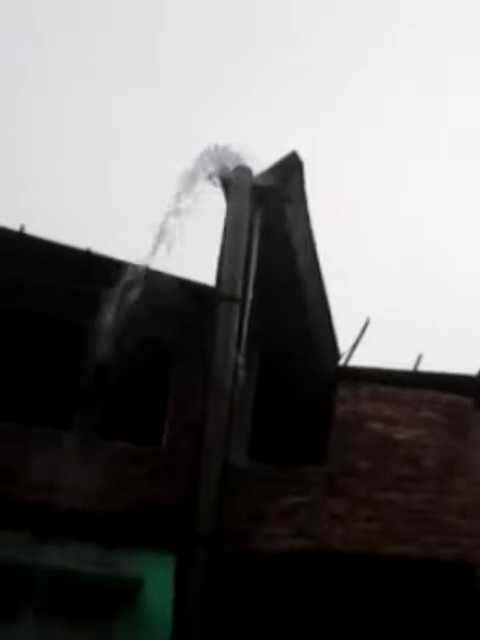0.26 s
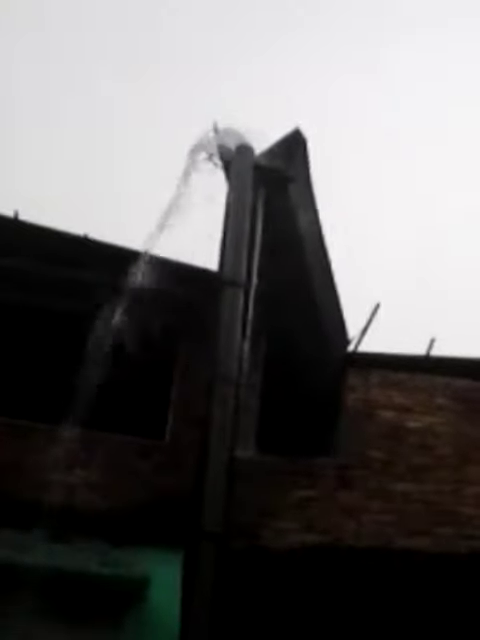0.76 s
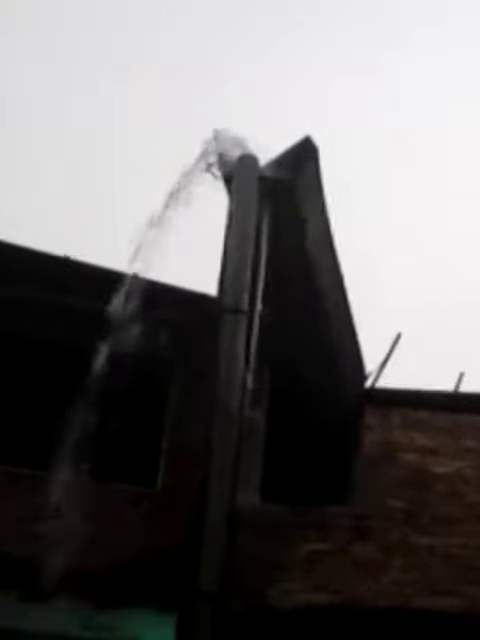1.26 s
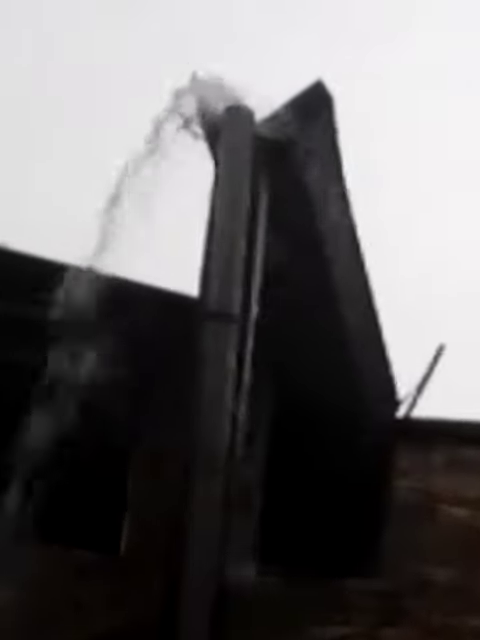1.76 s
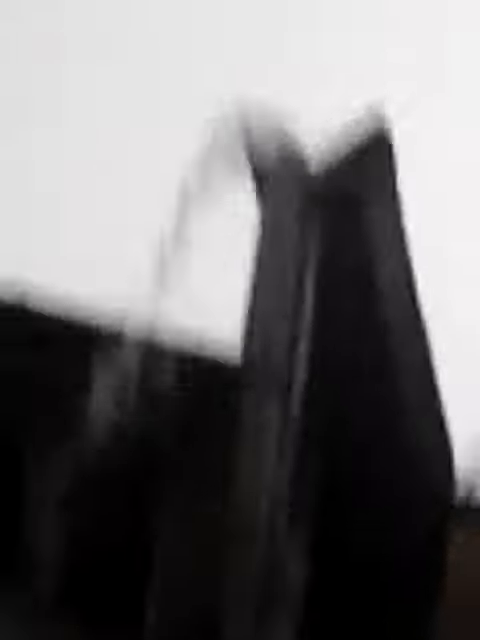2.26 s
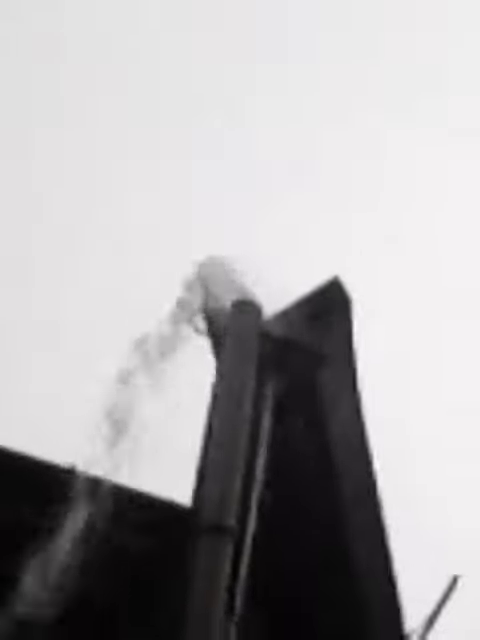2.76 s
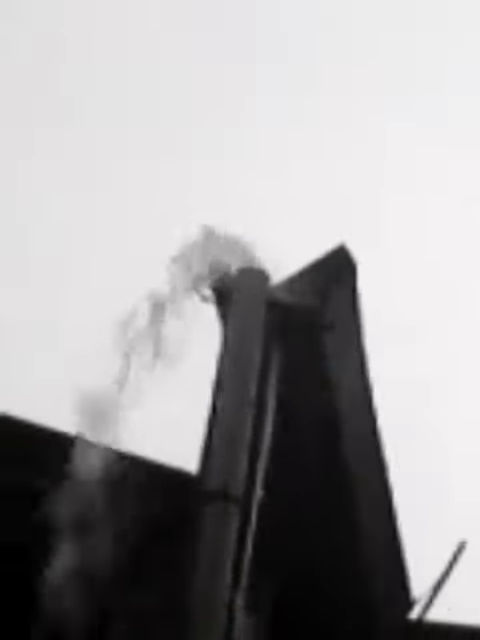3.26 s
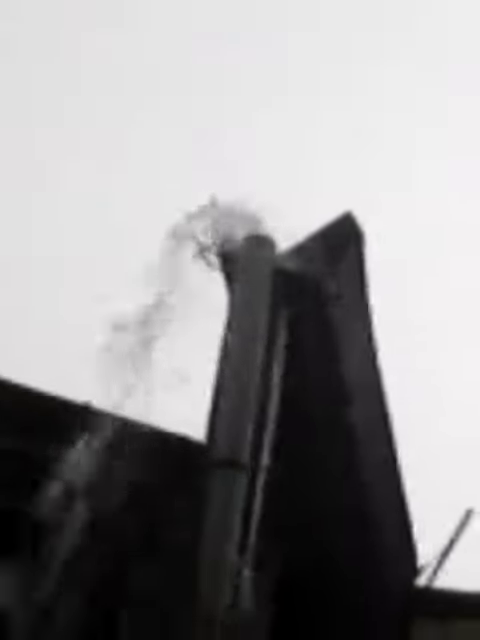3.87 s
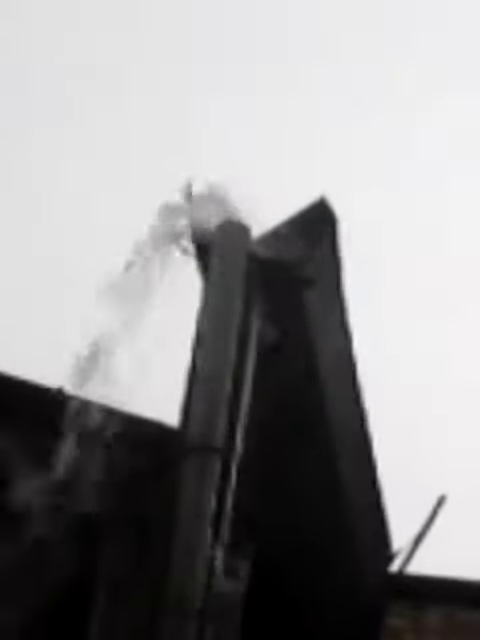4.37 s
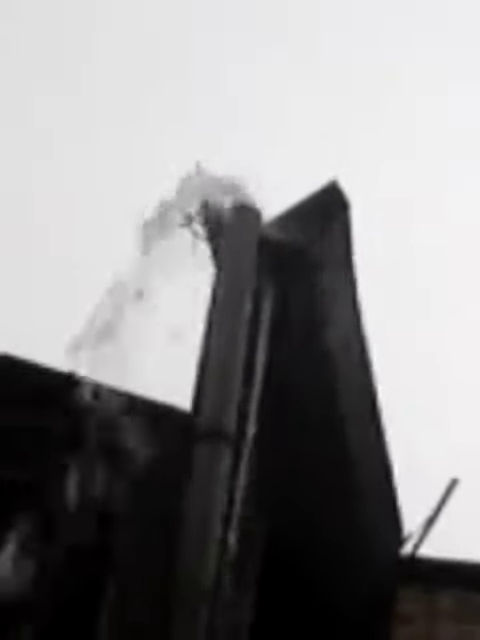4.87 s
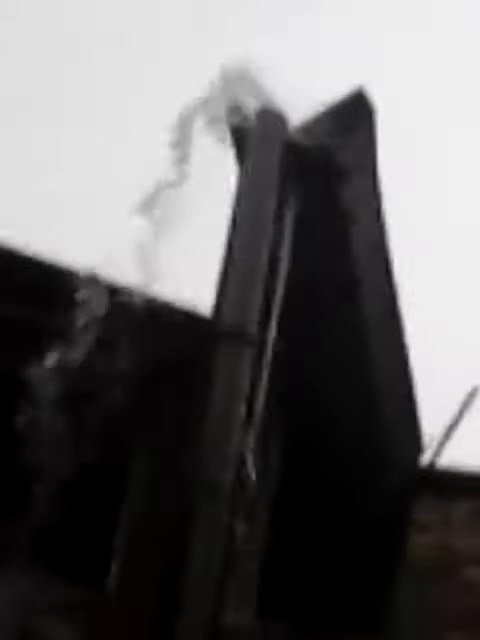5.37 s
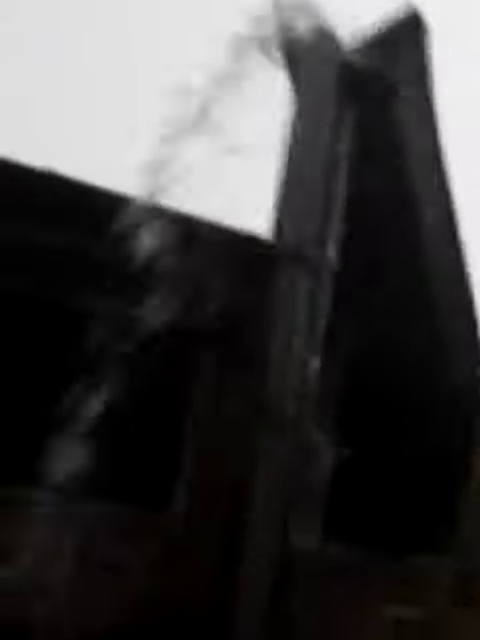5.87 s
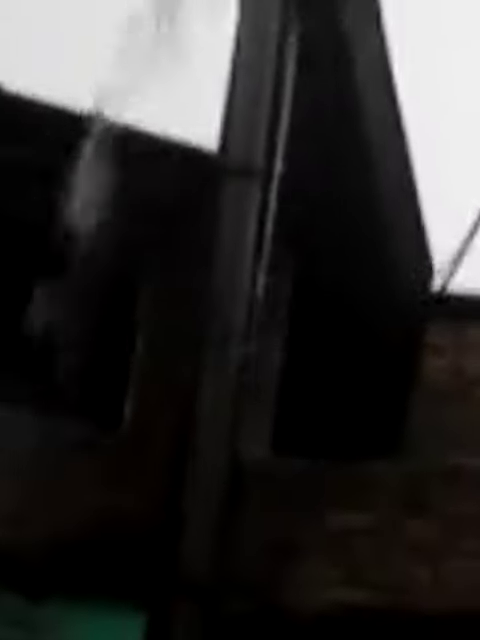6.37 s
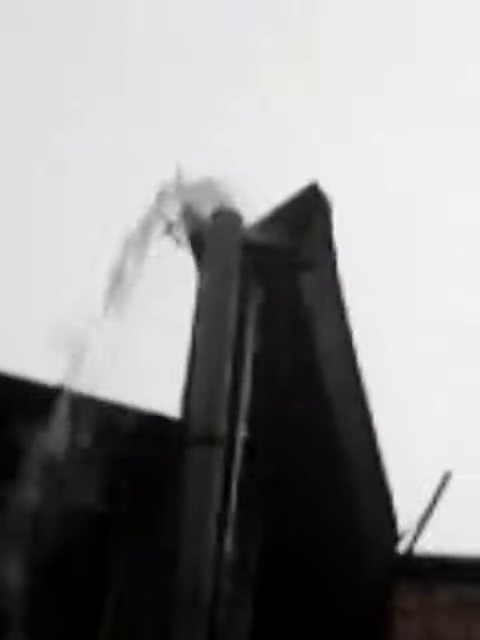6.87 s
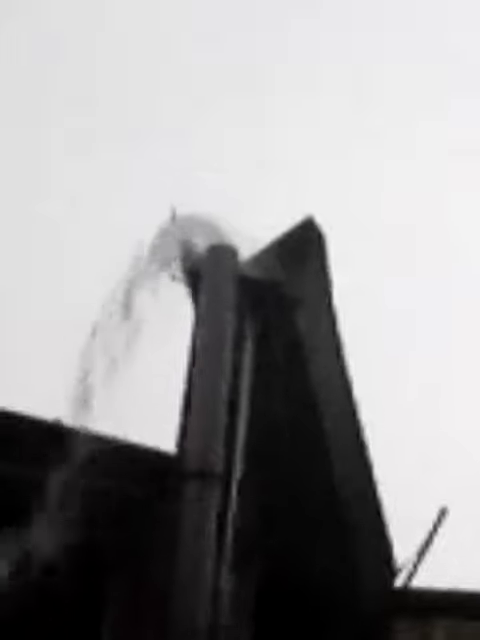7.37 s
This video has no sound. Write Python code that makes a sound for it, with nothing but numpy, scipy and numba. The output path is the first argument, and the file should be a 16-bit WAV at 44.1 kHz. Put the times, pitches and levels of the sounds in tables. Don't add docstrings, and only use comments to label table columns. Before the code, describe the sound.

Water arcing from a roof spout slaps the ground in bright, uneven splashes over dull heavy rain, while thunder rumbles between the buildings.

```python
import sys
import numpy as np
from scipy import signal
from scipy.fft import rfft, irfft
from scipy.io import wavfile
from scipy.ndimage import uniform_filter1d
from numba import njit

SR = 44100
rng = np.random.default_rng(int(sys.argv[2]) if len(sys.argv) > 2 else 0)


def rack_gain(trim_db):
    fader = np.asarray(trim_db, float)
    return 10 ** (fader / 20)


def materialize(psi):
    bounded = np.clip(np.atleast_2d(psi).T, -1, 1)
    quanta = np.round(bounded * 32767).astype(np.int16)
    wavfile.write(sys.argv[1], SR, quanta)


N = 335601

# time in seconds, flow in dB, ringing centre in Hz.
SPOUT_FLOW = [(0, -22.5, 4730), (1.04, -26.5, 5120), (1.86, -27.5, 5210), (2.22, -24.5, 4960),
              (2.27, -26.5, 4140), (2.55, -33, 4000), (2.8, -32, 4070), (3.07, -25, 4250),
              (3.96, -24.5, 4590), (5.36, -28, 4550), (5.7, -42.5, 4150), (5.82, -36, 4300),
              (5.87, -26, 4450), (6.03, -24.5, 4570), (6.1, -29.5, 4150), (6.61, -42, 4270),
              (6.64, -30.5, 4080), (7.61, -25, 5060)]
# start in seconds, peak in dB, 60 dB decay time in seconds.
SLUG_IMPACTS = [(0.1894, -13, .15), (0.3434, -12, .12), (0.396, -5.5, 0.051), (0.6704, -6.5, .25),
                (0.8194, -11, 0.34), (1.2014, -12, .2), (1.2714, -10, .15), (1.4494, -14, .15),
                (1.5374, -7.5, 0.52), (1.942, -10, 0.28), (2.3166, -9.5, .25), (2.4894, -12, .2),
                (2.9494, -27, .2), (3.1063, -7, .25), (3.1624, -9, 0.19), (3.456, -10, .12),
                (3.8264, -10, 0.3), (4.1036, -14, .15), (4.2777, -10, 0.35), (4.6194, -12, .25),
                (4.6594, -8.5, 0.36), (4.9224, -12, .3), (5.3194, -9, 0.29), (5.9624, -8, 0.22),
                (6.0094, -7, 0.18), (6.4194, -16, 0.2), (6.6388, -9.5, 0.63), (6.9381, -5.5, 0.22),
                (7.3168, -11, .2), (7.5104, -9, 0.31)]
# frequency in Hz, density in dB per Hz.
SPRAY_SPECTRUM = [(1000, -22), (2500, -1.5), (4000, 5.5), (7000, 1), (10000, -4), (13000, -6.5),
                  (16500, -12)]
# frequency in Hz, density in dB per Hz.
RAIN_SPECTRUM = [(25, -29), (60, -56), (100, -22.5), (170, -9.5), (260, -6.5), (500, -2), (700, -4),
                 (1050, -4.5), (1500, -3), (2150, -1.5), (2900, -2.5), (4200, -9.5), (7500, -17),
                 (16000, -20)]
# start in seconds, level in dB relative to the trough, hold in seconds.
GUTTER_GULPS = [
    (0.435, 3, 0.1),
    (1.793, 2, .1),
    (3.823, 5, 0.039),
    (6.024, -2, .03),
    (6.457, 4, .03),
    (6.524, 6.5, 0.033),
    (6.96, -4, 0.065),
]
# time in seconds, level in dB.
THUNDER_ROLL = [
    (1.45, -37),
    (1.56, -30),
    (1.65, -17),
    (2.05, -18),
    (2.7, -29),
    (3.3, -26),
    (4.9, -31),
    (5.25, -33),
    (7.61, -40),
]
# start in seconds, peak in dB, hold in seconds, boom centre in Hz.
THUNDER_CLAPS = [(1.549, -20, 0.051, 290), (1.6, -13.5, 0.018, 250), (1.674, -22.5, 0.037, 244),
                 (1.772, -15.5, 0.038, 260), (1.925, -19, 0.054, 238), (2.15, -27, 0.026, 290),
                 (2.316, -24, .04, 221), (3.07, -28.5, 0.054, 286), (3.246, -24.5, 0.056, 246),
                 (3.36, -23, 0.017, 300), (3.504, -25, 0.053, 275), (3.602, -21, 0.066, 238),
                 (3.796, -19, 0.072, 258), (4.1, -35, 0.017, 332), (4.21, -30, 0.11, 250),
                 (4.465, -28.5, 0.026, 245), (4.63, -23.5, 0.056, 333), (4.796, -25, 0.16, 290),
                 (4.96, -24.5, .05, 270), (5.316, -39, .04, 310), (6.404, -33.5, .15, 290),
                 (7.31, -38, 0.29, 300)]
# frequency in Hz, density in dB per Hz.
ROLL_SPECTRUM = [(60, -22.5), (110, -6.5), (150, -4), (230, -5), (380, -4.5), (520, -7.5), (620, -12),
                 (1000, -16), (1500, -22.5), (3000, -41)]
# frequency in Hz, density in dB per
# Hz.
WASH_SPECTRUM = [(22, -9), (40, -1), (65, -1), (105, -3), (125, -22), (180, 14)]
# time in seconds, low edge in Hz, high edge in Hz.
NOISE_BANDS = [(.128, 13000, 14600), (1.475, 6200, 8400), (1.475, 10300, 11900), (1.475, 13000, 14600),
               (1.73, 5100, 6400), (1.73, 11700, 13200), (1.73, 13700, 15300), (1.985, 5100, 6400),
               (2.055, 6900, 8400), (2.055, 9600, 11900), (2.845, 6200, 7700), (2.985, 6900, 8400),
               (2.985, 10300, 11900), (3.38, 5700, 7000), (3.40, 11000, 13200), (3.727, 14400, 15750),
               (4.075, 4100, 5200), (5.70, 4700, 6400), (5.70, 13000, 15750), (6.722, 13700, 15750),
               (6.745, 5700, 7000), (6.745, 8300, 10500), (7.163, 8300, 9800)]

SPRAY_DB, SPRAY_DB_PER_OCTAVE, SPRAY_PER_FLOW = -6, 24, -0.13
SLUG_ATTACK_S = 0.006
RAIN_DB, RAIN_PER_FLOW, RAIN_SLUG_DB = -29, 0.18, -29
GUTTER_DB, GUTTER_WANDER_DB = -1.5, 1.5
GULP_ATTACK_S, GULP_T60_S = 0.0071, 0.29
CLAP_ATTACK_S, CLAP_T60_S = 0.015, 0.45
WASH_DB, WASH_WANDER_DB, ROLL_WANDER_DB = -14, 9, 1
CRACK_DB, CRACK_HZ = -14, 800


def spout():
    flow_db, ring_hz = curves(SPOUT_FLOW)
    spray_db = SPRAY_DB + SPRAY_DB_PER_OCTAVE * np.log2(ring_hz / 4600) + SPRAY_PER_FLOW * (flow_db + 28)
    flutter_db = 0.15 * walk(9) + 0.2 * walk(24.88) + 0.6 * walk(90)
    flow = np.sqrt(rack_gain(flow_db + flutter_db) ** 2 + rack_gain(-15) ** 2 * slugs())
    hits = drops(2500, spread_db=2.0, blur=1.76)
    slug_s = np.transpose(SLUG_IMPACTS)[0]
    hits[(slug_s * SR).astype(int)] += rack_gain(19)
    centre = 4600 * (ring_hz / 4600) ** 1.1 * (1 + 0.012 * walk(12))
    centre = np.clip(centre, 2000, 9000)
    ring = svf(hits, 0.93 * centre, 1.65)
    ring = svf(ring, 1.03 * centre, 1.15)
    ring = unit(svf(ring, 1.135 * centre, 1.5))
    fizz = bubbles(count=2500, lo_hz=3513.0, hi_hz=15060.0, cycles=28.3, spread_db=0.5)
    gusts_db = np.clip(1.24 * walk(14), -2.5, 2.5)
    spray = (colour(hits, SPRAY_SPECTRUM) + rack_gain(-12) * fizz) * rack_gain(spray_db + 4.0 + gusts_db)
    return flow * (rack_gain(-3.5) * ring + spray)


def slugs():
    s, db, t60 = np.transpose(SLUG_IMPACTS)
    return swells(s, db, 0 * s, SLUG_ATTACK_S, np.c_[np.maximum(t60, 0.03)])


def rain():
    steady = rack_gain(RAIN_DB + RAIN_PER_FLOW * (curves(SPOUT_FLOW)[0] + 27.5))
    level = np.sqrt(steady ** 2 + rack_gain(RAIN_SLUG_DB + 7) ** 2 * slugs())
    bed = colour(drops(3000, spread_db=0.5, blur=1.43), RAIN_SPECTRUM)
    trough_hz = 1000 * (1 + 0.15 * walk(6))
    gutter = svf(drops(900, spread_db=2.1, blur=1.5), trough_hz, 1.2)
    gutter = unit(svf(gutter, trough_hz, 1.2))
    gulps = swells(*np.transpose(GUTTER_GULPS), GULP_ATTACK_S, GULP_T60_S)
    splash = np.sqrt(rack_gain(GUTTER_DB + GUTTER_WANDER_DB * walk(15)) ** 2 + gulps)
    puddles = bubbles(count=1500, lo_hz=455.0, hi_hz=3515.0, cycles=14.0, spread_db=1.5)
    gusts_db = 0.6 * walk(9) + 1.07 * walk(30)
    return level * rack_gain(3 + gusts_db) * (bed + rack_gain(-7.0) * splash * gutter + rack_gain(-16.5) * puddles)


def bubbles(count, lo_hz, hi_hz, cycles, spread_db):
    when, pitch, size = rng.random((count, 3)).T
    start = (when * N).astype(np.int64)
    hz = lo_hz * (hi_hz / lo_hz) ** pitch
    level = rack_gain(-spread_db * np.log(size + 0.01))
    return unit(plinks(start, hz, cycles, level, 0.0343))


@njit
def plinks(start, hz, cycles, size, glide):
    y = np.zeros(N + 8192)
    for k in range(len(start)):
        life = cycles * SR / hz[k]
        phase = 0.
        for i in range(min(int(4 * life), 8192)):
            phase += 2 * np.pi * hz[k] * (1 + glide * i / life) / SR
            y[start[k] + i] += size[k] * np.exp(-i / life) * np.sin(phase)
    return y[:N]


def thunder():
    s, clap_db, hold_s, clap_hz = np.transpose(THUNDER_CLAPS)
    roll_power = rack_gain(curves(THUNDER_ROLL)[0] + ROLL_WANDER_DB * walk(14)) ** 2
    power = roll_power + swells(s, clap_db, hold_s, CLAP_ATTACK_S, CLAP_T60_S)
    roll_db = 10 * np.log10(power)
    shocks = drops(600, spread_db=2.5, blur=2.33)
    roll = colour(shocks, ROLL_SPECTRUM)
    boom_hz = np.interp(np.arange(N) / SR, s + hold_s, clap_hz) * (1 + 0.14 * walk(13))
    boom = unit(svf(roll, np.clip(boom_hz, 120, 500), 2.2))
    boom = boom * rack_gain(0.42 * (roll_db + 14.5) - 2.0)
    wash_db = WASH_DB + WASH_WANDER_DB * walk(10) + 0.12 * (roll_db + 25) - 5.5
    wash = rack_gain(wash_db) * colour(shocks, WASH_SPECTRUM)
    fronts = np.sqrt(swells(s, clap_db + CRACK_DB, 0.54 * hold_s, 0.012, 0.3))
    crack = unit(svf(drops(500, spread_db=3.5, blur=0.67), np.full(N, 1. * CRACK_HZ), 0.53))
    begun = np.arange(N) > THUNDER_ROLL[0][0] * SR
    return begun * rack_gain(roll_db - 3.0) * (roll + boom + wash) + fronts * crack


def drops(rate, spread_db, blur):
    falls = rng.random(N) < rate / SR
    size_db = spread_db * np.minimum(rng.exponential(size=N), 6)
    hit = falls * rng.standard_normal(N) * rack_gain(size_db)
    return unit(unit(hit) + blur * rng.standard_normal(N))


def swells(start_s, db, hold_s, attack_s, t60):
    since = np.arange(0, N, 64) / SR - np.c_[start_s]
    fall = 60 * np.maximum(since - attack_s - np.c_[hold_s], 0) / t60
    rise = np.clip(since / attack_s, 0, 1)
    power = (rise * rack_gain(np.c_[db] - fall)) ** 2
    return np.repeat(power.sum(axis=0), 64)[:N]


def walk(rate):
    k = int(SR / rate)
    held = np.repeat(rng.standard_normal(N // k + 1), k)
    return 1.27 * uniform_filter1d(uniform_filter1d(held, k), k)[:N]


def curves(table):
    s, *columns = np.transpose(table)
    return [np.interp(np.arange(N) / SR, s, c) for c in columns]


def unit(x):
    return x / np.sqrt(np.mean(x ** 2))


def colour(x, points):
    hz, db = np.transpose(points)
    grid = np.linspace(1, SR / 2, 4097)
    response_db = np.interp(np.log(grid), np.log(hz), db)
    cep = irfft(np.log(rack_gain(response_db)))
    cep[1:4096] *= 2
    cep[4097:] = 0
    impulse = irfft(np.exp(rfft(cep)))
    return unit(signal.fftconvolve(x, impulse)[:N])


@njit
def svf(x, hz, sharp):
    y, b, l, k = np.empty(len(x)), 0., 0., 1 / sharp
    for i in range(len(x)):
        g = np.tan(np.pi * hz[i] / SR)
        v = (b + g * (x[i] - l)) / (1 + g * (g + k))
        b, l, y[i] = 2 * v - b, l + 2 * g * v, k * v
    return y


def scene():
    return np.tile(spout() + rain() + thunder(), (2, 1))


def noise_bands(x):
    n = np.arange(2048) + 0.5
    window = np.sin(np.pi * n / 2048)
    for s, lo_hz, hi_hz in NOISE_BANDS:
        i = 566 + 1024 * (round((s * SR - 566) / 1024) - 1)
        bins = np.arange(int(lo_hz * 2048 / SR), int(hi_hz * 2048 / SR)) + 0.5
        basis = np.cos(np.pi / 1024 * np.outer(bins, n + 512)) * window
        strength = np.sqrt(np.mean((basis @ x[0, i:i + 2048]) ** 2)) / 512
        noise = rng.standard_normal(len(bins)) @ basis
        x[:, i:i + 2048] += rack_gain(-5.0) * strength * noise * np.array([[1], [-1]])
    return x


def band_limit(x):
    return signal.sosfilt(signal.butter(12, 16110, fs=SR, output="sos"), x)


def record(dry):
    thin = signal.sosfilt(signal.butter(2, 70, "high", fs=SR, output="sos"), dry)
    thin = thin - 0.24 * svf(thin[0], np.full(N, 2800.), 4.4)
    spectrum = rfft(np.tanh(1.109 * thin) / 1.114)
    hz = np.arange(spectrum.shape[1]) * SR / N
    mix = irfft(spectrum * (hz < 15760), N)
    return band_limit(noise_bands(mix))


dry = scene()
out = record(dry)
materialize(out)
```